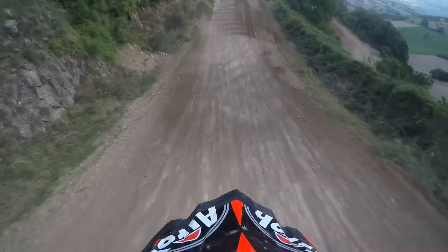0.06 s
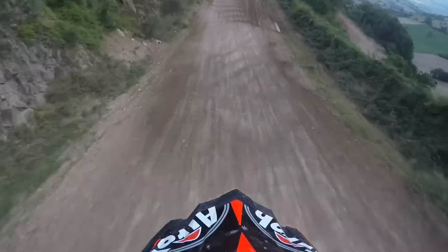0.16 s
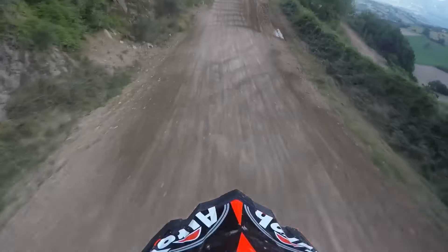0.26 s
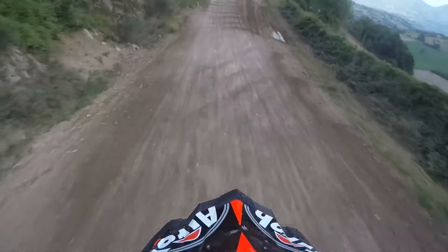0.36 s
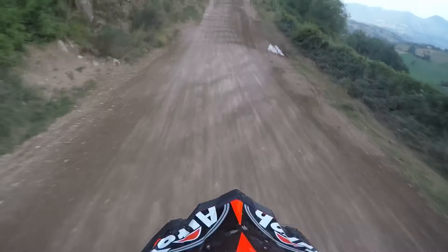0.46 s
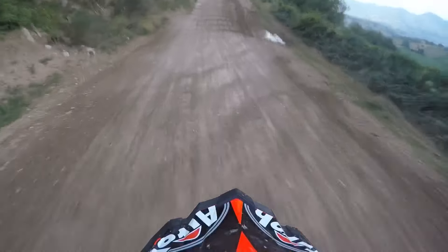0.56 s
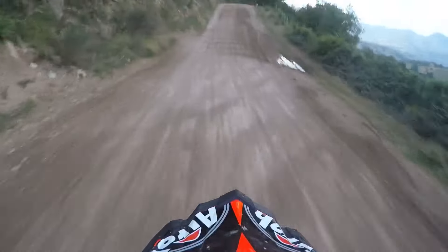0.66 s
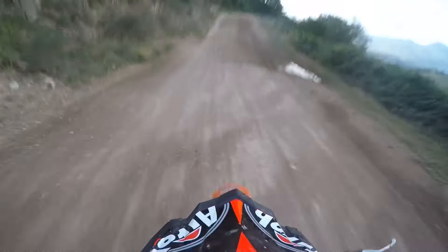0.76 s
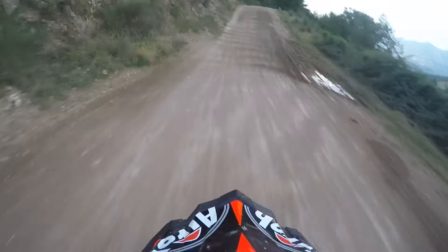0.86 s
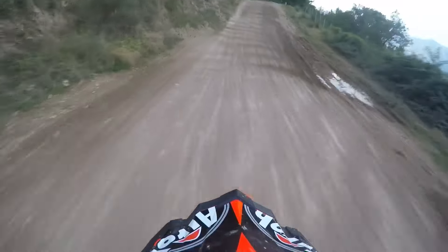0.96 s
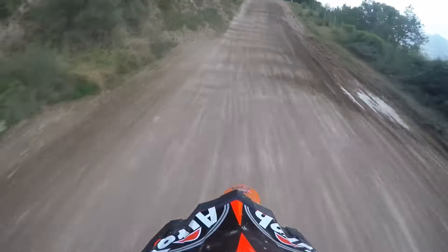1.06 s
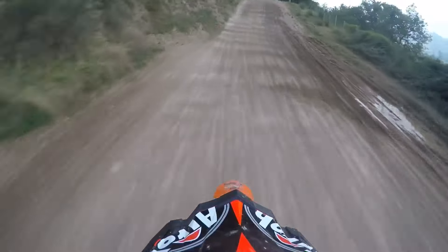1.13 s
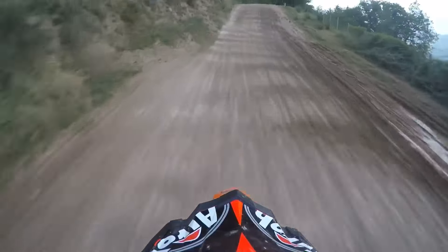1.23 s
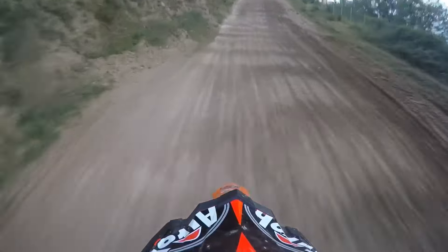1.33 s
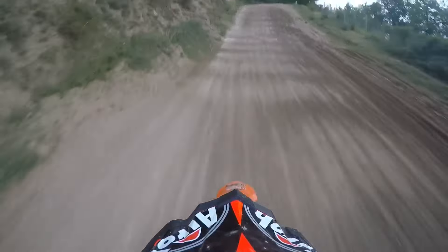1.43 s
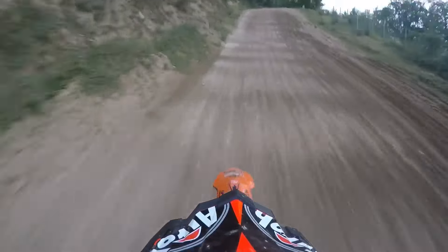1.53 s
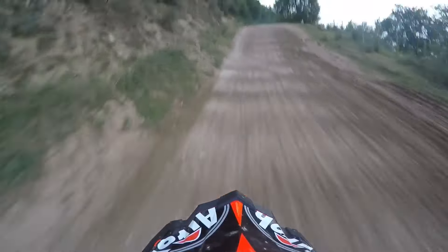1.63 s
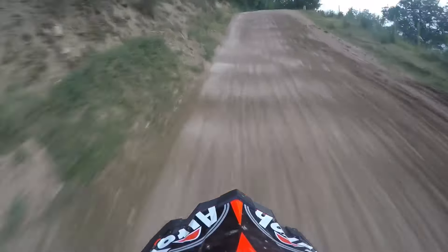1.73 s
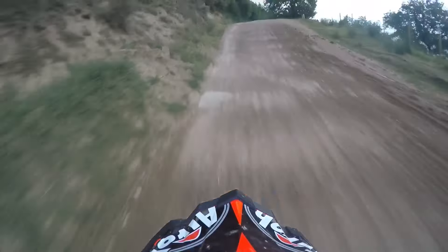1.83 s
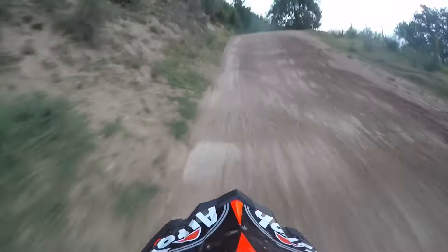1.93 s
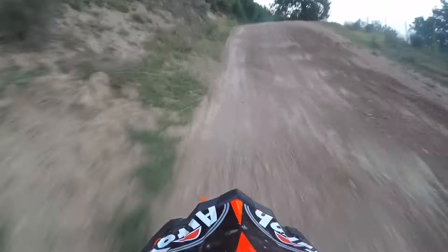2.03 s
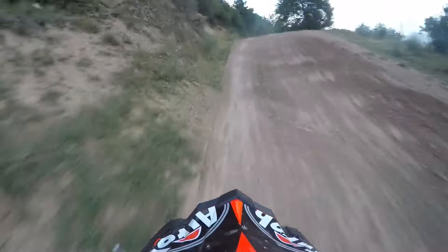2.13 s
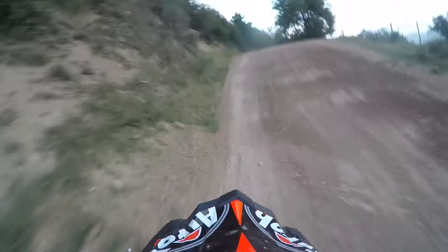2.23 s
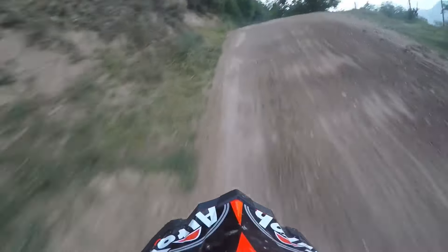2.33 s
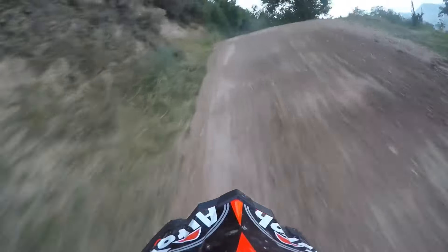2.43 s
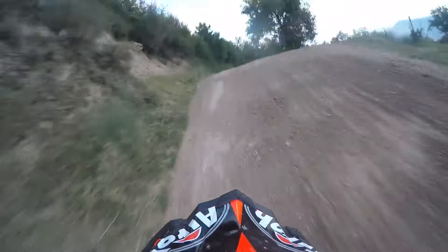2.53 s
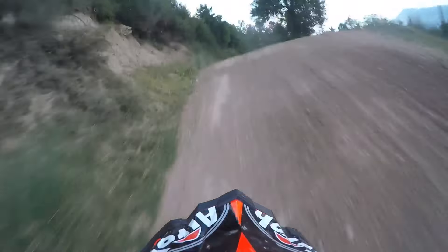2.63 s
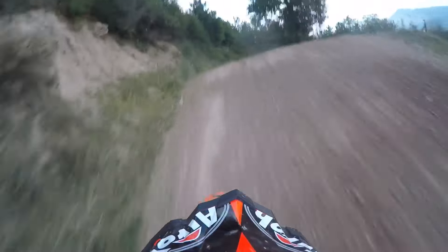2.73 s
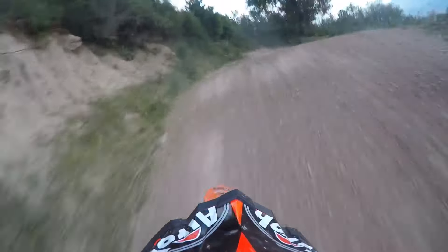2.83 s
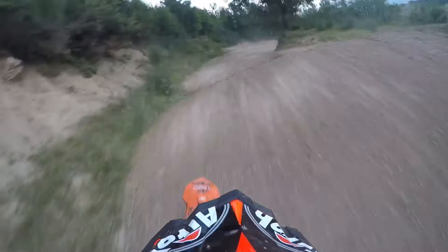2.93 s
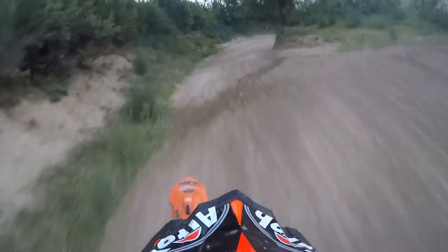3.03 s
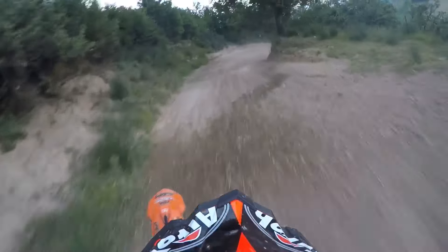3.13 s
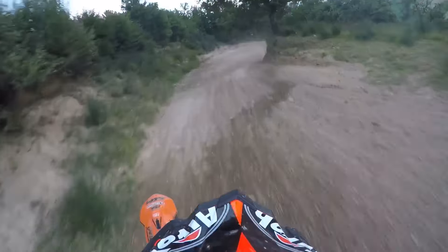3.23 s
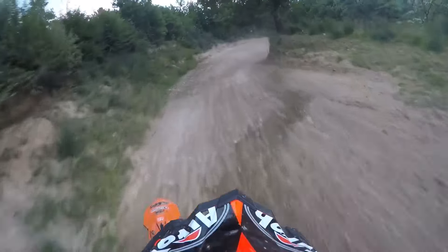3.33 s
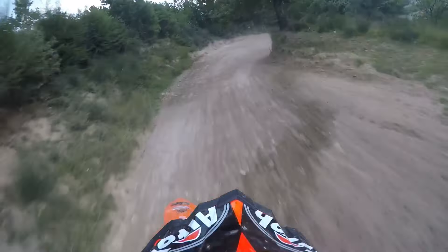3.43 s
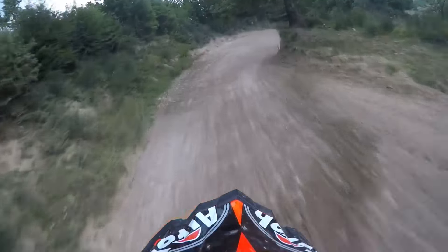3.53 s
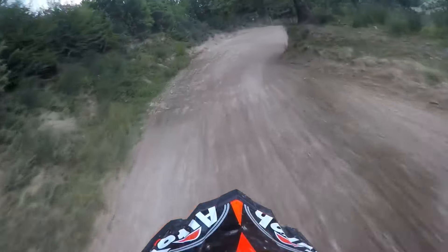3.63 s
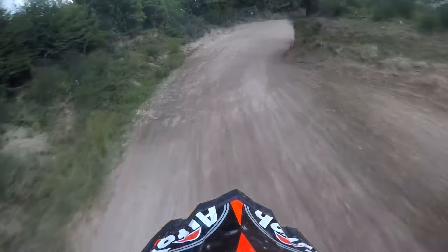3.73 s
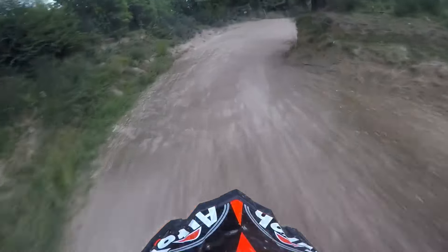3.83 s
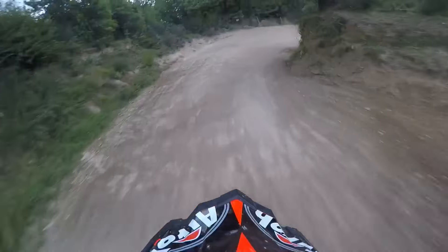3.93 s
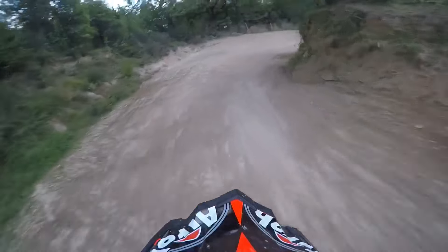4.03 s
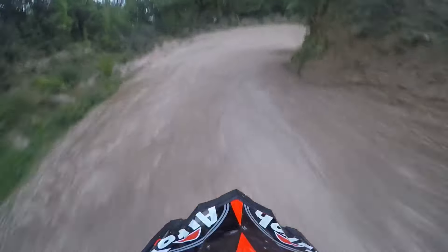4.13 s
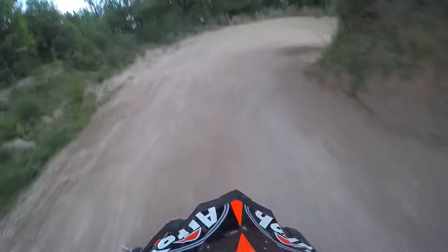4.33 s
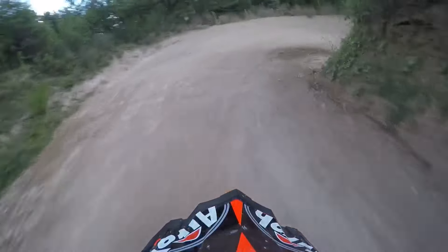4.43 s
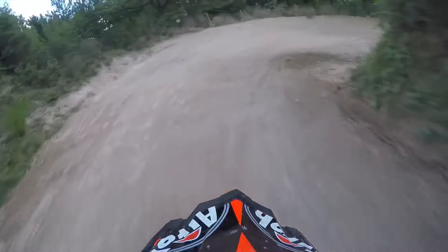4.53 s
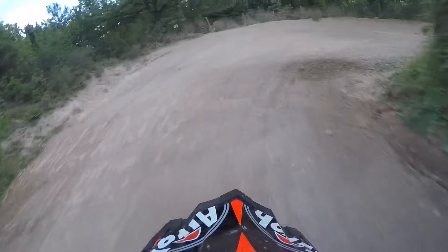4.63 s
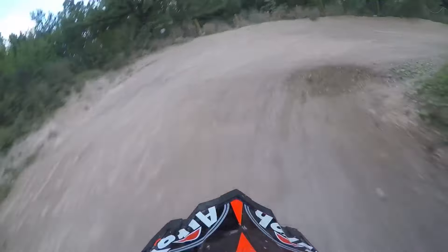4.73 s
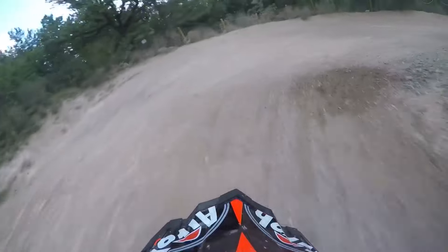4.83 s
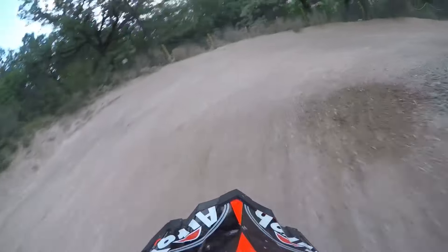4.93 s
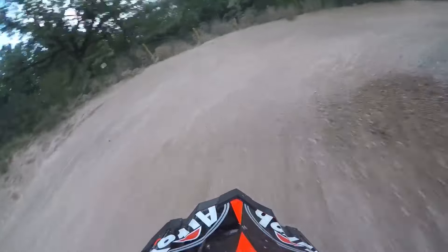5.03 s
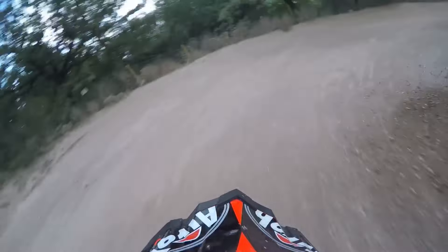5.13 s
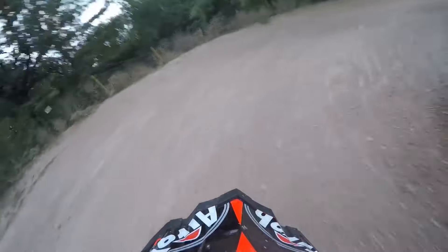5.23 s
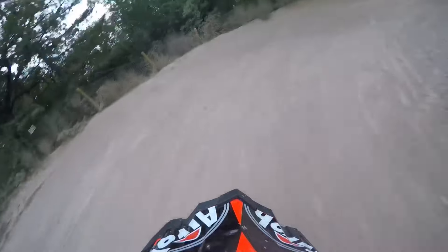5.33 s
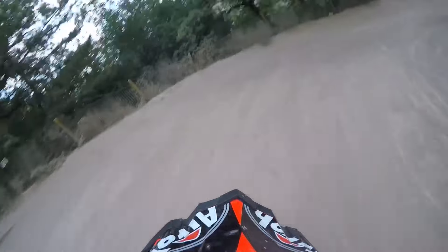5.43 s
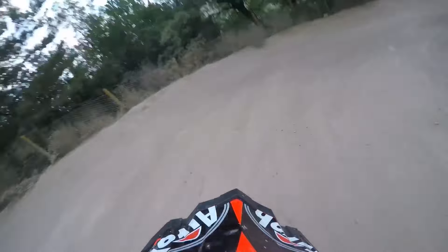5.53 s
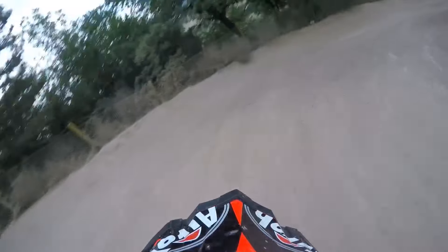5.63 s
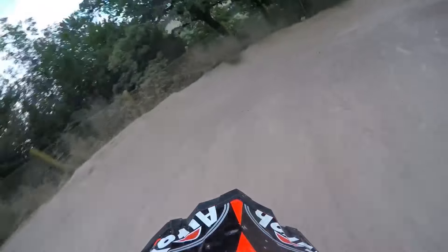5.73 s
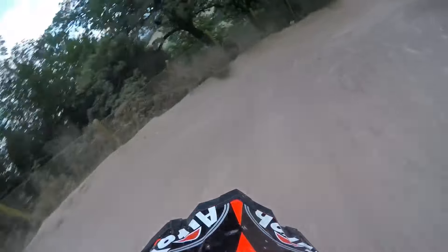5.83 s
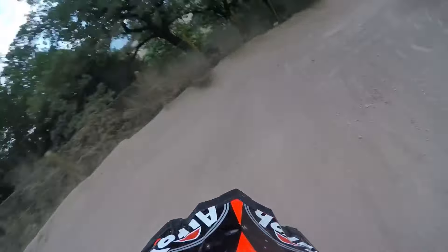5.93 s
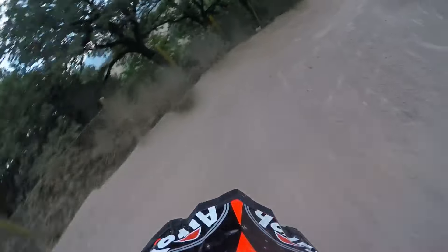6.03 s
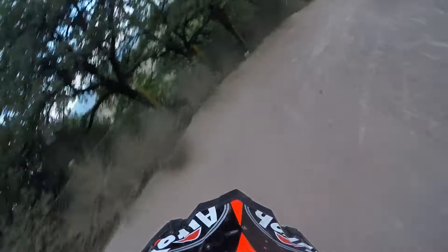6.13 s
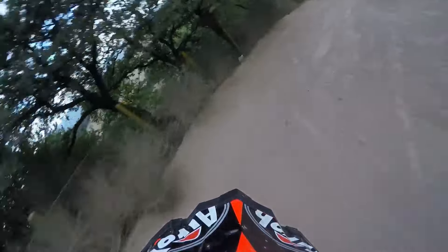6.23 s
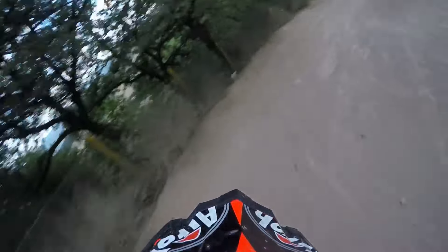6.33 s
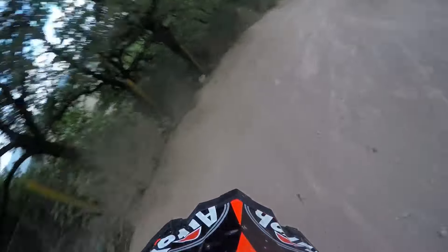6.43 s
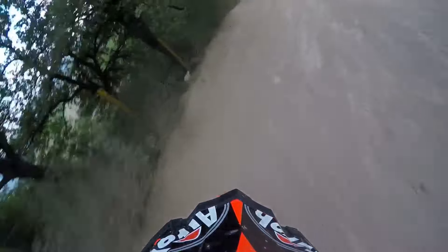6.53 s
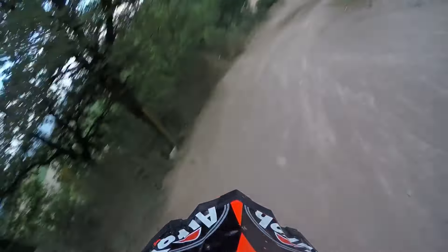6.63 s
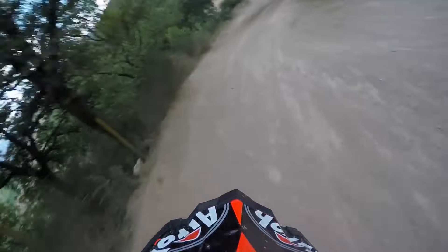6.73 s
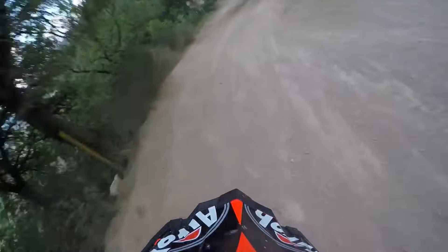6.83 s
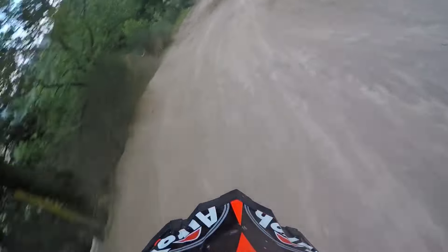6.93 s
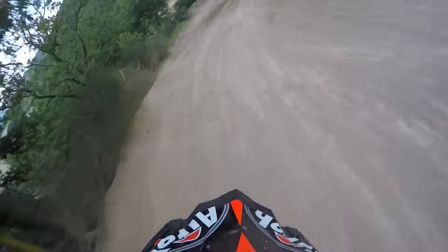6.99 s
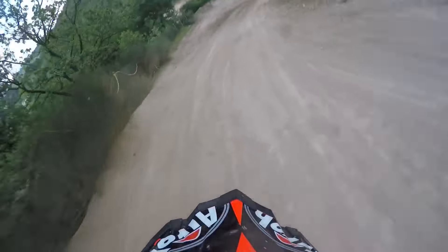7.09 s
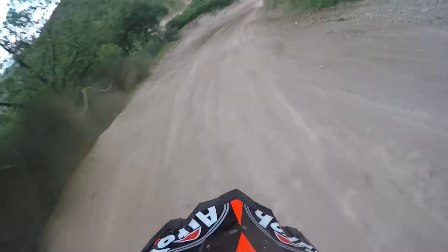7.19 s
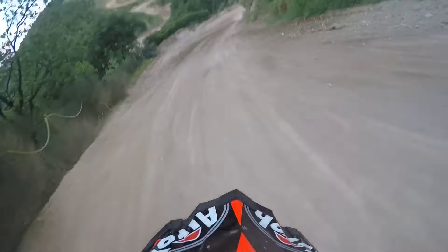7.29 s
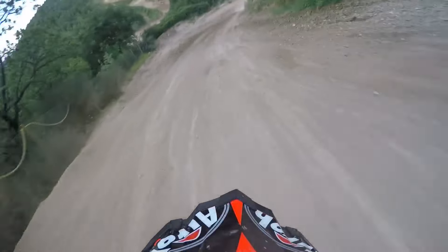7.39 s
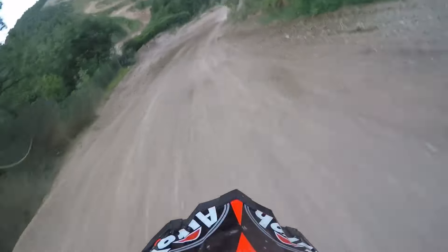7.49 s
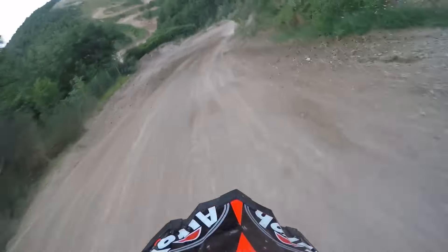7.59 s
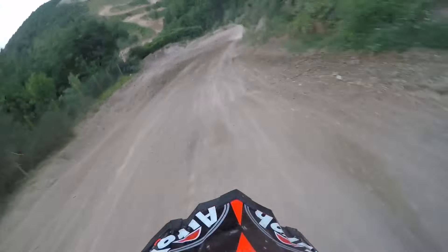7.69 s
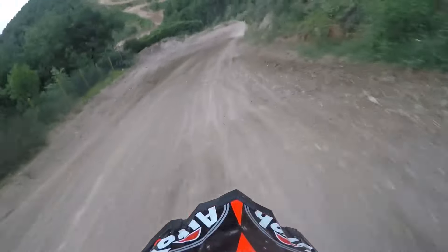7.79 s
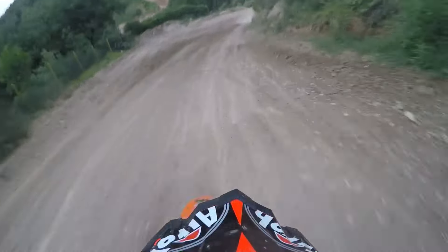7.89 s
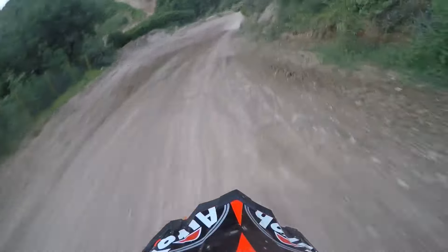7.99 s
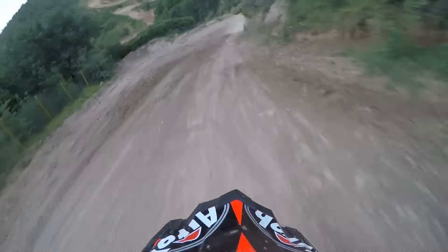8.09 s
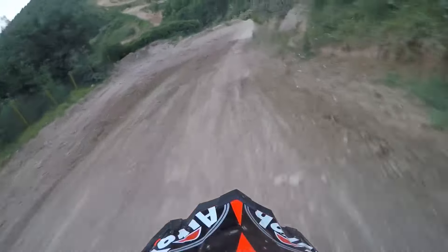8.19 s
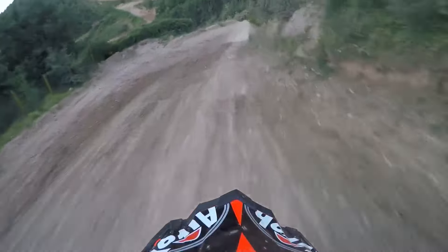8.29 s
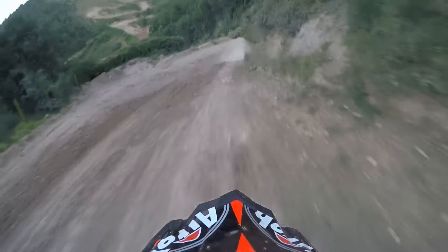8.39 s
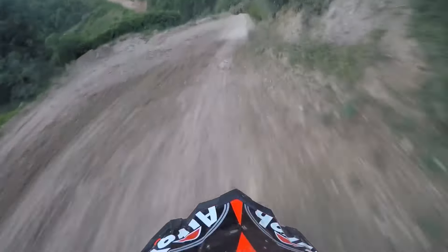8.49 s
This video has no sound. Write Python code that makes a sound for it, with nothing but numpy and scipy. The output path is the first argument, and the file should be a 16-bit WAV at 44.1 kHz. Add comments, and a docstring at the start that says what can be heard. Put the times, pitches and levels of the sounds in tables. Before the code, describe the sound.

A single-cylinder dirt bike pulls hard, shifts up, blips, chugs slowly through a corner, then accelerates away amid wind rumble and chain clatter.

```python
"""A four-stroke single-cylinder dirt bike heard from the rider's helmet: first two pulls with a gear change
between them, then two blips, a slow corner off the throttle, and last a pull out of it.
Throughout, each firing excites the resonances of the exhaust and turbulent gas rasps after it; impacts of chain,
gears and valves ring the cases, tyres throw grit as hissing noise, and wind rumbles and buffets on the microphone."""
import sys
import numpy as np
from scipy import signal
from scipy.fft import rfft, irfft, next_fast_len
from scipy.io import wavfile
from scipy.ndimage import uniform_filter1d, minimum_filter1d

SR = 44100
rng = np.random.default_rng(int(sys.argv[2]) if len(sys.argv) > 2 else 0)


def generate_wav(sig):
    """Save sig (samples, or channels by samples) to the path in sys.argv[1] as 16-bit PCM at SR."""
    pcm = np.round(np.clip(np.atleast_2d(sig).T, -1, 1) * 32767).astype(np.int16)
    wavfile.write(sys.argv[1], SR, pcm)


N = 377055


def undb(db):
    """Amplitude ratio of a level in decibels."""
    return 10 ** (np.asarray(db) / 20)


def curves(table):
    """Linear interpolation over time of each column after the first."""
    s, *columns = np.transpose(table)
    return [np.interp(np.arange(N) / SR, s, column) for column in columns]


def unit(x):
    """Normalisation to an rms of 1."""
    return x / np.sqrt(np.mean(x ** 2))


def steady(x, size=3000):
    """Normalisation to a running rms of 1, over windows of size samples."""
    power = uniform_filter1d(uniform_filter1d(x ** 2, size), size)
    return x / np.sqrt(power + 1e-12)


def colour(x, points):
    """Minimum-phase filter of the given (f/Hz, level/dB) response: it rings only after each pulse."""
    size = next_fast_len(N + SR // 4, True) // 2 * 2
    hz, db = np.transpose(points)
    bin_hz = np.arange(size // 2 + 1) * SR / size
    log_gain = np.log(undb(np.interp(np.log(bin_hz + 1e-6), np.log(hz), db)))
    # folding the cepstrum onto positive times makes the response causal
    cepstrum = irfft(log_gain)
    cepstrum[1:size // 2] *= 2
    cepstrum[size // 2 + 1:] = 0
    response = np.exp(rfft(cepstrum))
    return irfft(rfft(x, size) * response)[:N]


def walk(rate):
    """Low-pass random motion: about rate new values a second, smoothed, of rms 1."""
    hold = max(int(SR / rate), 1)
    steps = np.repeat(rng.standard_normal(N // hold + 1), hold)
    return unit(uniform_filter1d(uniform_filter1d(steps, hold), hold)[:N])


def grains(rate, spread_db):
    """Random impacts, about rate a second: many small, a few large."""
    size = undb(spread_db * np.minimum(rng.exponential(size=N), 5))
    struck = rng.random(N) < rate / SR
    return unit(struck * size * rng.standard_normal(N))


def gate(turns, start, length):
    """Exponential decay restarted once a cycle; start and length are shares of the cycle."""
    return np.exp(-((turns - start) % 1) / length)


def swell(s, half):
    """Gaussian envelope centred on time s, down to 1/e at half seconds either side."""
    return np.exp(-((np.arange(N) / SR - s) / half) ** 2)


def with_swells(db, events):
    """Power addition of swells (t/s, half length/s, level/dB) to a level in dB."""
    added = sum((undb(peak) * swell(s, half)) ** 2 for s, half, peak in events)
    return 10 * np.log10(undb(db) ** 2 + added)


# deep wind rumble: columns f/Hz, level/dB
WIND_RUMBLE = [(5, -2), (14, -1), (24, 5), (38, 2), (55, -22), (90, -25), (170, -36), (800, -77)]
# air drumming round the helmet: columns f/Hz, level/dB
HELMET_DRUMMING = [(25, -27.5), (50, -5), (68, -2.5), (82, 0), (105, -14), (150, -20.5), (230, -25),
                   (800, -85)]
# gusts: columns t/s, half length/s, rumble level/dB, drumming level/dB
WIND_GUSTS = [(.62, 0.095, -6.5, -32), (.755, 0.051, -9, -30), (1.399, 0.098, -18, -21),
              (1.724, 0.18, -22, -21.5), (1.958, 0.061, -16.5, -32), (2.255, 0.12, -18.5, -20.5),
              (2.6, .11, -12.5, -25.5), (2.937, 0.16, -15.5, -27), (4.128, 0.086, -9, -29),
              (4.26, 0.076, -17.5, -33), (5.135, 0.25, -16, -43), (5.616, .04, -17, -38),
              (5.769, 0.05, -20, -42), (6.011, 0.048, -22, -42), (6.25, 0.11, -15.5, -44),
              (6.848, 0.066, -16.5, -36), (7.283, 0.066, -15, -43), (7.66, 0.046, -29, -31),
              (8.48, 0.098, -22, -24.5)]
# single buffets of air on the microphone: columns t/s, peak level/dB, swing f/Hz
AIR_BUFFETS = [(.555, -9, 31.5), (.643, -5, 29.7), (0.747, -5, 47.7), (1.392, -12, 63.4),
               (2.029, -7, 24.16), (2.126, -8, 55.1), (2.214, -8.5, 55.9), (2.315, -3.5, 48.7),
               (4.121, -5.5, 44.2), (4.2, -8.5, 30), (5.07, -14, 27.9), (5.249, -15.5, 64.8),
               (6.22, -12.5, 26.2), (6.87, -11.5, 31.92)]
# steady wind at the usual pace level, its rise in dB per dB of pace, and the rms of its wander
USUAL_PACE_DB, WIND_PER_PACE, WIND_WANDER_DB = -45, 0.21, 2.5
RUMBLE_DB, DRUM_DB = -30.5, -30
# steady wind and clatter dip for a moment
LULL_S, LULL_HALF_S, LULL_DB, LULL_CLATTER_DB = 0.86, 0.091, -27, -3.5


def wind(pace_db):
    """Turbulent pressure: eddies rumble on the microphone; a big one swings the pressure down and back up."""
    flow_db = WIND_PER_PACE * (pace_db - USUAL_PACE_DB) + LULL_DB * swell(LULL_S, LULL_HALF_S)
    rumble_gusts = [(s, half, db) for s, half, db, _ in WIND_GUSTS]
    drum_gusts = [(s, half, db) for s, half, _, db in WIND_GUSTS]
    rumble_db = with_swells(RUMBLE_DB + flow_db + WIND_WANDER_DB * walk(40), rumble_gusts)
    drum_db = with_swells(DRUM_DB + flow_db + WIND_WANDER_DB * walk(13), drum_gusts)
    rumble = steady(colour(rng.standard_normal(N), WIND_RUMBLE), size=5000) * undb(rumble_db)
    drumming = steady(colour(rng.standard_normal(N), HELMET_DRUMMING)) * undb(drum_db)
    out = rumble + drumming
    for s, db, hz in AIR_BUFFETS:
        angle = 2 * np.pi * hz * (np.arange(N) / SR - s)
        # the big eddy sweeps the small ones aside as it passes
        swept = 1 - .5 * np.exp(-(angle / 4) ** 2)
        out = out * swept + undb(db) * angle * np.exp((1 - angle ** 2) / 2)
    return out


# grit and passing air: columns f/Hz, level/dB
GRIT_HISS = [(2500, 1), (4500, -2.5), (5400, 2), (6200, 3), (7300, 0), (8300, -7.5), (9400, -8),
             (10100, -7), (11200, -14), (12500, -10.5), (13800, -18), (15200, -23)]


def dirt(hiss_db):
    """Broadband noise with impacts: knobbly tyres spray grit through a hiss of passing air."""
    grit = rng.standard_normal(N) + 0.5 * grains(1500, 2.1)
    return unit(colour(grit * undb(1.0 * walk(35)), GRIT_HISS)) * undb(hiss_db)


# ring of the engine cases: columns f/Hz, level/dB
CASE_RING = [(200, -14), (700, -21.5), (1400, -17.5), (1580, -7), (1750, -14), (2100, -16), (2350, -3),
             (2850, -3.5), (3080, 0), (3220, 0), (3340, 1), (3480, -2), (3750, -8), (4200, -17.5),
             (5000, -31), (8000, -54)]


def drivetrain(turns, clatter_db):
    """Impact excitation: chain rollers, gear teeth and valves tick densely against the resonant metal cases."""
    valves = 1 + 0.66 * gate(turns, .1, 0.017) + .5 * gate(turns, 0.67, 0.13)
    ticks = grains(14000, 0.45) * valves * undb(0.98 * walk(45))
    return unit(colour(ticks, CASE_RING)) * undb(clatter_db)


# jolts that shake the bike and throw up stones: columns t/s, half length/s, rattle level/dB, grit level/dB
GROUND_JOLTS = [(.52, .015, -27.5, -44), (0.727, 0.022, -23, -43), (2.6, 0.028, -34, -46),
                (4.121, 0.017, -25.5, -42), (5.07, 0.0091, -42, -47), (5.17, 0.013, -40, -47),
                (5.256, 0.01, -40, -47), (6.2, 0.033, -40, -57), (6.735, .025, -44, -49)]


def rattle():
    """Transient excitation: a jolt shakes the whole bike in a short rough burst, coloured like the gas."""
    shake = sum(undb(db) * swell(s, half) for s, half, db, _ in GROUND_JOLTS)
    return unit(colour(rng.standard_normal(N), GAS_RASP)) * shake


# levels that follow the ride over the ground, before trims: columns t/s, clatter level/dB, hiss level/dB
RIDE_PACE = [(0.0, -20, -39), (0.4, -21, -38.5), (0.6, -22.5, -43), (1.76, -18, -36), (2.28, -20, -36),
             (2.36, -27.5, -44), (2.55, -22.5, -42.5), (2.83, -26.5, -45.5), (2.93, -24, -41),
             (3.33, -26, -47), (3.76, -20.5, -42.5), (4.07, -22, -44), (4.29, -27, -47),
             (5.79, -33.5, -56.5), (6.26, -32, -53.5), (6.57, -40.5, -62), (6.74, -29, -49.5),
             (6.83, -32, -54.5), (7.62, -22, -41.5), (7.79, -24, -41), (8.43, -19.5, -38.5),
             (8.55, -22, -39)]
CLATTER_DB, CLATTER_LOAD_DB = 1.18, -1.2  # trim of the clatter; change with the chain pulled taut
HISS_DB, HISS_LOAD_DB = 0.6, 1  # trim of the hiss; change when the tyre digs in


def ride_levels(opening):
    """Level addition: pace, throttle, lull and jolts give the clatter and hiss levels, and the bare pace."""
    clatter_db, pace_db = curves(RIDE_PACE)
    clatter_db = clatter_db + CLATTER_DB + CLATTER_LOAD_DB * opening
    clatter_db = clatter_db + LULL_CLATTER_DB * swell(LULL_S, LULL_HALF_S)
    stones = [(s, half, db) for s, half, _, db in GROUND_JOLTS]
    hiss_db = with_swells(pace_db + HISS_DB + HISS_LOAD_DB * opening, stones)
    return clatter_db, hiss_db, pace_db


# brief metallic squeals: columns t/s, f/Hz, level/dB (before flutter), half length/s
METAL_SQUEALS = [(.38, 6850, -38, 0.039), (1.22, 6640, -41, 0.044), (2.904, 3343, -23, 0.019),
                 (2.949, 2750, -16, 0.024), (7.935, 7170, -35, 0.031)]


def squeals():
    """Frequency modulation: narrow wavering tones swell and fade within a few hundredths of a second."""
    t, out = np.arange(N) / SR, 0
    bent = t + np.cumsum(0.018 * walk(250)) / SR
    for s, hz, db, half in METAL_SQUEALS:
        out = out + undb(db) * swell(s, half) * np.sin(2 * np.pi * hz * bent)
    return out * undb(3 * walk(150))


# engine speed: columns t/s, firing rate f/Hz (before smoothing and hop)
FIRING_RATE = [(0.0, 87.8), (0.14, 82.46), (0.21, 89.35), (0.36, 117.6), (0.48, 114.7), (0.6, 74.25),
               (0.66, 75.76), (1.0, 88.7), (1.12, 84.5), (1.35, 94.7), (1.55, 92.15), (1.71, 99.1),
               (1.79, 92), (1.9, 75.45), (2.0, 69.1), (2.26, 65.4), (2.36, 58.84), (2.48, 56.5),
               (2.64, 65.43), (2.81, 61.3), (2.95, 77.46), (3.17, 61.1), (3.57, 43.76), (3.64, 41.78),
               (3.76, 59.22), (3.83, 68.83), (3.93, 66.05), (4.38, 44.86), (4.5, 36.5), (4.57, 35.8),
               (4.93, 41.33), (5.12, 33.85), (5.24, 35.47), (5.43, 31.3), (5.76, 36.6), (6.14, 39.7),
               (6.26, 43.36), (6.31, 40), (6.45, 28.4), (6.59, 28.64), (6.69, 36.5), (6.81, 45.25),
               (6.93, 53.44), (7.1, 59.9), (7.5, 69.8), (7.6, 83.33), (7.69, 77.56), (7.9, 114.8),
               (8.05, 96.96), (8.14, 92.5), (8.36, 100.3), (8.55, 86.8)]
# the rear wheel hops over ripples and the engine speed swings with it
HOP_S, HOP_HALF_S, HOP_HZ, HOP_SHARE = 1.38, .14, 8.3, .045


def engine_speed():
    """Rotational inertia: firings per second, rounded by the flywheel and swung by the hopping wheel."""
    swing = np.cos(2 * np.pi * HOP_HZ * (np.arange(N) / SR - HOP_S))
    hop = HOP_SHARE * swell(HOP_S, HOP_HALF_S) * swing
    return uniform_filter1d(curves(FIRING_RATE)[0], size=900) * (1 + hop)


# twists of the throttle: columns opens t/s, starts to shut t/s, time to open/s, time to shut/s,
# opening/0-1, extra growl level/dB, extra rasp level/dB (bark and gas)
THROTTLE_TWISTS = [(0.112, 0.35, 0.087, 0.63, 0.89, 2.5, 1.5), (0.474, 0.566, 0.032, 0.68, 0.89, 0, 0.5),
                   (0.605, 1.795, 0.067, 0.05, 0.72, -0.5, -2.5),
                   (1.096, 1.746, 0.14, 0.083, 0.82, 0.5, -1.5), (2.821, 2.974, .065, 0.17, 0.89, 2, 3),
                   (3.612, 3.779, 0.086, 0.066, 0.79, 7.5, -1.5), (6.629, 7.2, 0.074, 0.21, .43, 14, -1.5),
                   (7.099, 7.5, 0.27, 0.19, 0.63, 3, 5), (7.144, 8.503, 0.5, 0.058, 0.93, -3.5, 1.5)]


def twists():
    """Piecewise-linear control: each twist opens, holds and shuts; the widest one sets opening, growl and rasp."""
    t = np.arange(N) / SR
    shapes = []
    for start, end, rise, fall, opening, _, _ in THROTTLE_TWISTS:
        ramp = np.minimum((t - start) / rise, 1 - (t - end) / fall)
        shapes.append(opening * np.clip(ramp, 0, 1))
    shapes = np.array(shapes)
    widest = shapes.max(axis=0)
    extras = np.array(THROTTLE_TWISTS)[shapes.argmax(axis=0), -2:].T * widest
    extra_growl_db, extra_rasp_db = uniform_filter1d(extras, size=2500)
    return widest, extra_growl_db, extra_rasp_db


# level laws of the engine's voices, before other level changes: columns level/dB with the throttle shut,
# level/dB wide open, slope/(dB per octave of speed) shut, the same open
NOTE_LEVELS = (-37.5, -10.5, 11.5, 0.5)
GROWL_LEVELS = (-48, -27, 6.5, 3.5)
RASP_LEVELS = (-30, -23.5, 7.5, 1.5)
CHUG_LEVELS = (-32.5, -38.5, 2.5, -2)
CRUISE_HZ = 90  # firing rate at which the slopes add nothing


def voice_db(law, opening, hz):
    """Power-law scaling: the level of an engine voice follows the throttle and the revs."""
    shut_db, open_db, shut_slope, open_slope = law
    octaves = np.log2(hz / CRUISE_HZ)
    shut = shut_db + shut_slope * octaves
    wide_open = open_db + open_slope * octaves
    return (1 - opening) * shut + opening * wide_open


# the chug swells on the overrun, as the wheel drives the engine: columns t/s, half length/s, rise in level/dB
CHUG_OVERRUNS = [(3.695, 0.48, 10), (5.899, .2, 3.5), (6.29, 0.087, 5.5)]


def overrun_db():
    """Engine braking: the rise of the chug while the wheel drives the engine."""
    return sum(db * swell(s, half) for s, half, db in CHUG_OVERRUNS)


# rushing gas: columns f/Hz, level/dB
GAS_RASP = [(120, -30), (330, 4), (520, -0.5), (800, -1.5), (1150, 5), (1550, 0.5), (2050, -1.5),
            (2450, -1), (3300, -9.5), (4600, -15.5), (7000, -18), (15000, -96)]


def gas(turns, rasp_db, load):
    """Modulated jet noise: turbulent gas rushes out just after each firing, in sharper puffs under load."""
    puffs = .4 + (.1 + .5 * load) * gate(turns, .03, .25)
    share_db = -.2 - 6 * load
    return steady(colour(puffs * rng.standard_normal(N), GAS_RASP)) * undb(rasp_db + share_db)


def firings(turns, jitter_ms, scatter_db):
    """Quasi-periodic excitation: one pulse per engine cycle, each a little off in time and strength."""
    at = np.flatnonzero(np.diff(np.floor(turns)))
    late, strong = rng.standard_normal((len(at), 2)).T
    place = np.clip(at + late * jitter_ms[at] * SR / 1000, 0, N - 2)
    size, whole = undb(strong * scatter_db[at]), place.astype(int)
    # a pulse between two samples is shared by both
    pulses = np.zeros(N)
    pulses[whole] += size * (1 - place % 1)
    pulses[whole + 1] += size * (place % 1)
    return pulses


def reflections(x, decay_ms, drift_hz, count=3):
    """Multipath: dense short echoes off frame, ground and rider; their pattern shifts as the rider moves."""
    ms = np.arange(1100) * 1000 / SR
    echoes = rng.standard_normal((count, len(ms))) * np.exp(-ms / decay_ms)
    shares = np.array([walk(drift_hz) for _ in echoes])
    shares = shares / np.sqrt(np.sum(shares ** 2, axis=0) + .3)
    return sum(share * signal.fftconvolve(x, echo)[:N] for share, echo in zip(shares, echoes))


# main exhaust note: columns f/Hz, level/dB
PIPE_NOTE = [(40, -39.5), (95, -24), (120, -17), (150, -17.5), (190, -2.5), (232, -5), (262, 6), (290, 6),
             (345, -1.5), (385, -14.5), (450, -22), (620, -33.5), (1450, -25), (5000, -66.5)]
# echoes inside the exhaust pipe: columns delay t/s, share of the pulse
PIPE_BOUNCES = [(.0034, 0.38), (.0058, 0.87), (.0116, .3)]
# upper pipe resonances: columns f/Hz, level/dB
PIPE_GROWL = [(200, -43), (380, -14), (460, 1), (525, 5.5), (600, 11.5), (690, -3), (790, -3.5),
              (1000, -15.5), (2000, -35)]
# bark of the silencer: columns f/Hz, level/dB
SILENCER_BARK = [(450, -23), (700, 0), (810, -9.5), (960, -0.5), (1150, 4), (1450, 6.5), (1680, 8),
                 (2080, -6.5), (2450, 1.5), (2800, -7), (3500, -4.5), (4600, -14.5), (9000, -50)]
# body of the chug with the throttle shut: columns f/Hz, level/dB
CHUG_BODY = [(30, -25), (60, 4.5), (88, 7), (135, 9), (178, -3.5), (230, -13), (285, -16), (345, -5.5),
             (410, -13), (540, -28.5), (700, -32), (1500, -69)]


def exhaust(turns, note_db, growl_db, rasp_db, chug_db, load):
    """Source and resonator: firings ring the pipe, even under load, ragged with the throttle shut."""
    jitter_ms = np.interp(load, [0, .5, 1], [.12, .1, .025])
    scatter_db = np.interp(load, [0, .5, 1], [1.5, 2.4, .8])
    pulses = firings(turns, jitter_ms, scatter_db)
    note = steady(colour(pulses, PIPE_NOTE)) * undb(note_db - 2 * (1 - load))
    # each pulse bounces along the header, which fills the gap to the next firing
    bounced = pulses + sum(share * np.roll(pulses, int(s * SR)) for s, share in PIPE_BOUNCES)
    growl = steady(colour(bounced, PIPE_GROWL)) * undb(growl_db - 4.5 + 4.5 * load)
    # the steep front of each pulse barks, the more so under load
    fronts = reflections(pulses, decay_ms=10.0, drift_hz=5)
    bark = steady(colour(fronts, SILENCER_BARK)) * undb(rasp_db - 8 + 8 * load)
    # the soft puff of each cycle stays when the bark has gone
    chug = steady(colour(pulses, CHUG_BODY)) * undb(chug_db)
    return note + growl + bark + chug


NOTE_CURVE = 1.02  # exponent above 1: the note comes on a little late in the throttle's travel
FLYWHEEL_S = .12  # time over which a gain of speed is felt
# extra rasp while the engine gains speed, and the gain of speed that brings most of it
SPIN_UP_DB, SPIN_UP_HZ_PER_S = 3.5, 140
SMOOTH_HZ = 87.5  # below this firing rate the load falls and the firings grow uneven
BOUNCE_DB, BOUNCE_PER_S = 0.36, 22  # clatter and grit rise and fall together on the uneven track


def scene():
    """Superposition: speed times every pulse, throttle sets its force, pace drives clatter, grit and wind."""
    hz = engine_speed()
    opening, extra_growl_db, extra_rasp_db = twists()
    turns = np.cumsum(hz) / SR
    acceleration = uniform_filter1d(np.gradient(hz) * SR, int(FLYWHEEL_S * SR))
    gaining = np.maximum(acceleration, 0)
    spin_up_db = SPIN_UP_DB * opening * np.tanh(gaining / SPIN_UP_HZ_PER_S)

    note_db = voice_db(NOTE_LEVELS, opening ** NOTE_CURVE, hz)
    growl_db = voice_db(GROWL_LEVELS, opening, hz) + extra_growl_db
    rasp_db = voice_db(RASP_LEVELS, opening, hz) + extra_rasp_db + spin_up_db
    chug_db = voice_db(CHUG_LEVELS, opening, hz) + overrun_db()
    load = np.clip((note_db + 38) / 18, 0, 1) * np.minimum(hz / SMOOTH_HZ, 1)

    clatter_db, hiss_db, pace_db = ride_levels(opening)
    bounce = undb(BOUNCE_DB * walk(BOUNCE_PER_S))
    ride = (dirt(hiss_db) + drivetrain(turns, clatter_db)) * bounce
    engine = gas(turns, rasp_db, load) + exhaust(turns, note_db, growl_db, rasp_db, chug_db, load)
    return (wind(pace_db) + ride + rattle() + squeals() + engine)[None]


TOP_HZ = 15100  # edge of the low-pass


def record(dry):
    """Peak limiting and band limiting: a limiter ducks the highest peaks; a steep low-pass cuts the top."""
    headroom = np.minimum(1, .9 / (np.abs(dry) + 1e-9))
    gain = uniform_filter1d(minimum_filter1d(headroom, size=301), size=301)
    low_pass = signal.ellip(10, .2, 80, TOP_HZ, fs=SR, output="sos")
    return signal.sosfilt(low_pass, dry * gain)


dry = scene()
out = record(dry)
generate_wav(out)
```